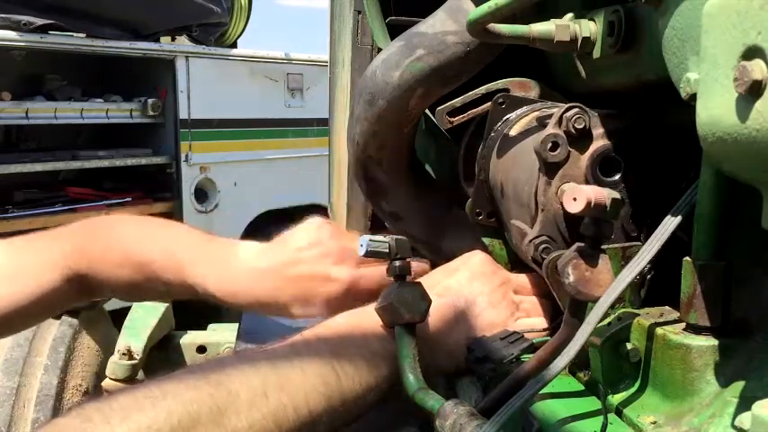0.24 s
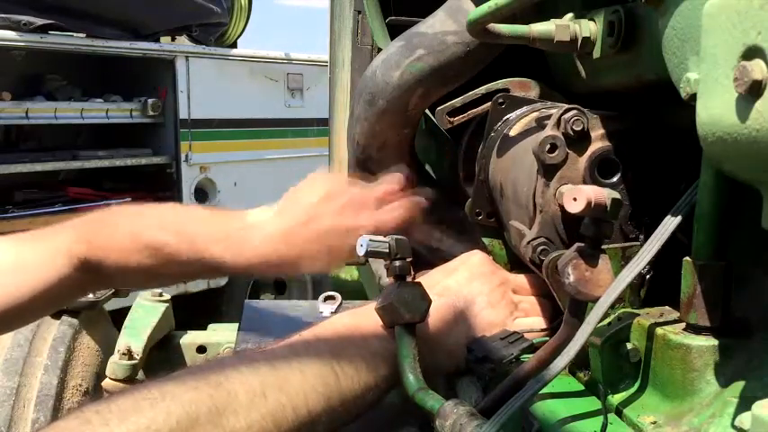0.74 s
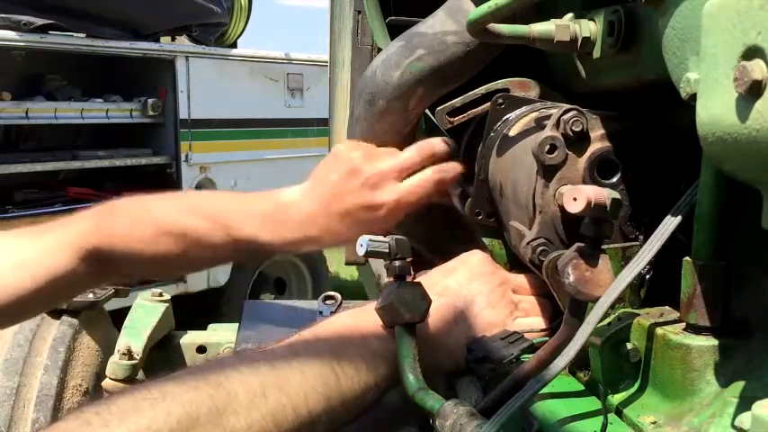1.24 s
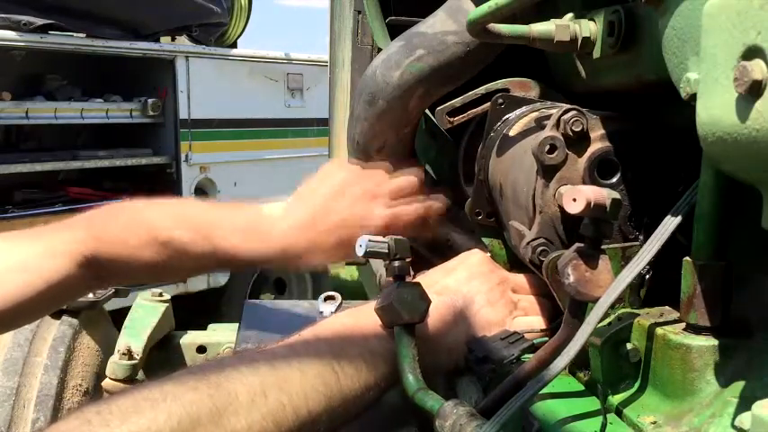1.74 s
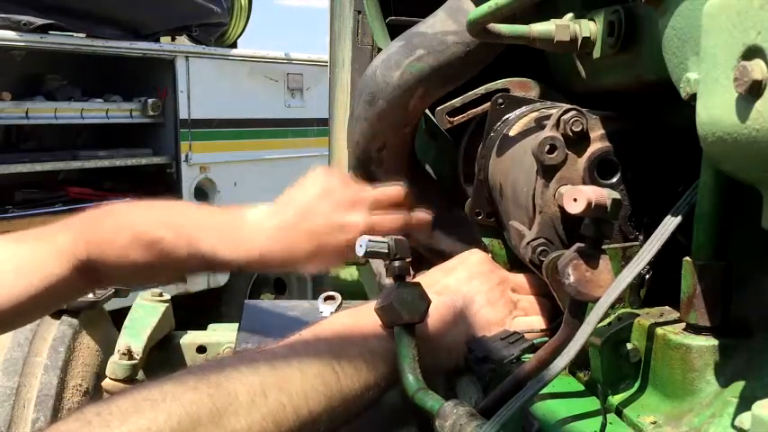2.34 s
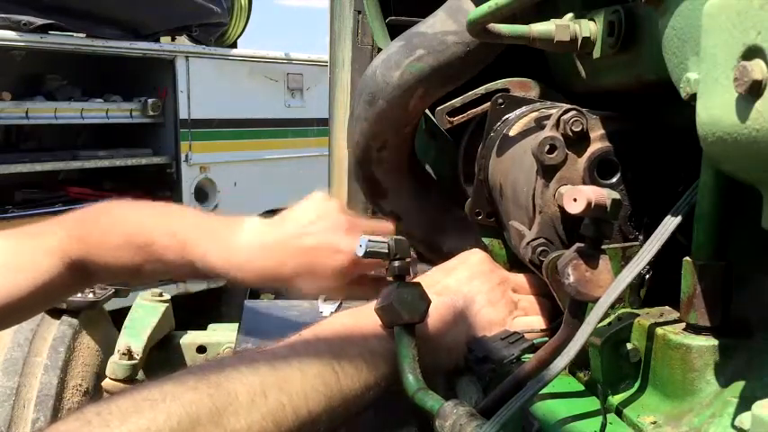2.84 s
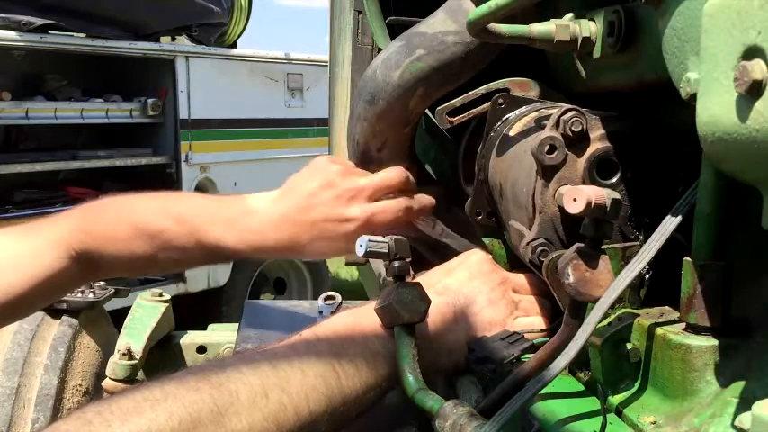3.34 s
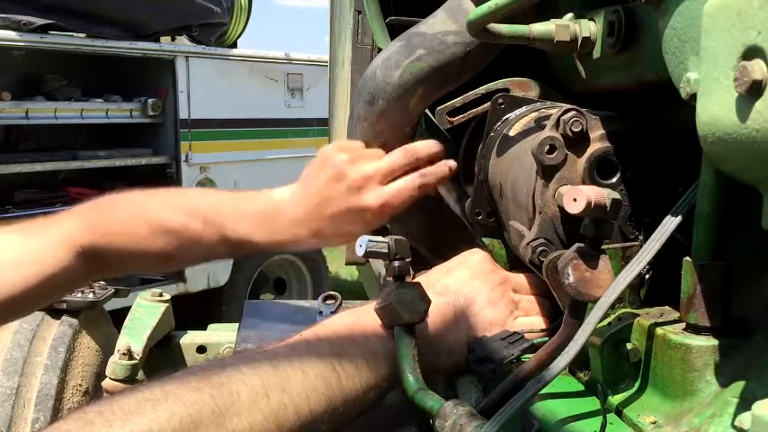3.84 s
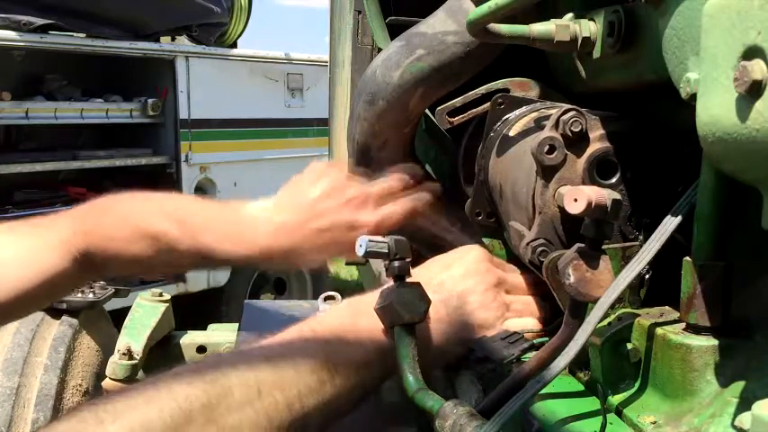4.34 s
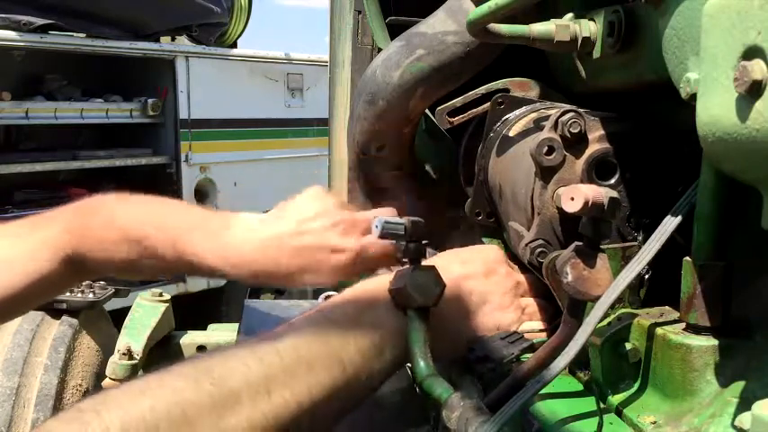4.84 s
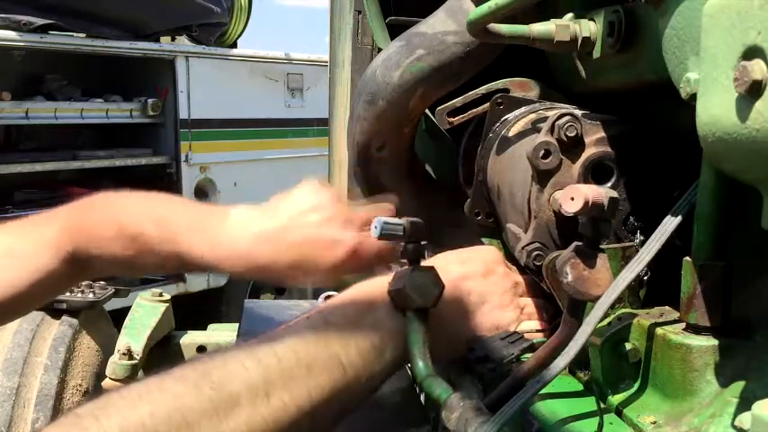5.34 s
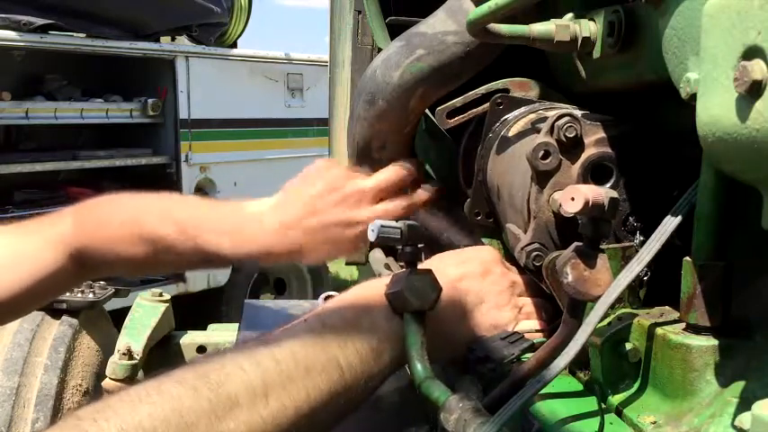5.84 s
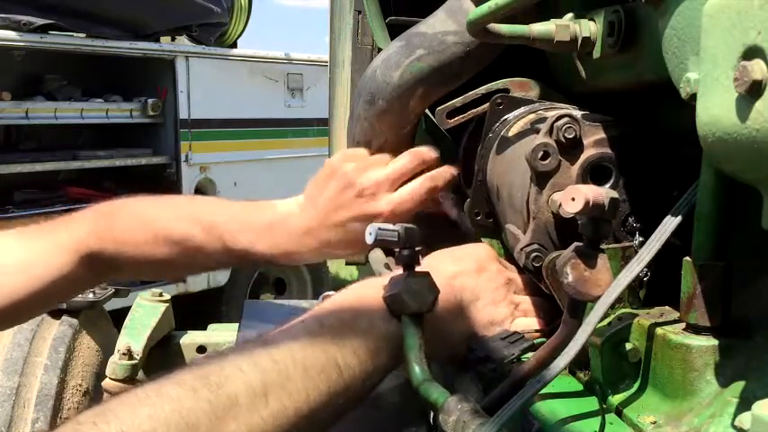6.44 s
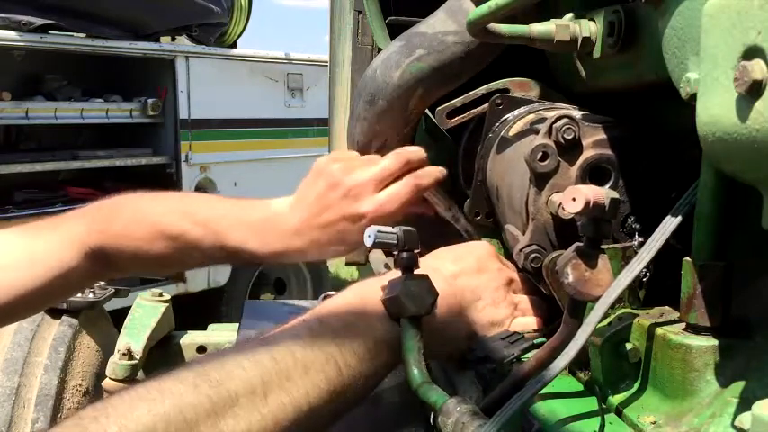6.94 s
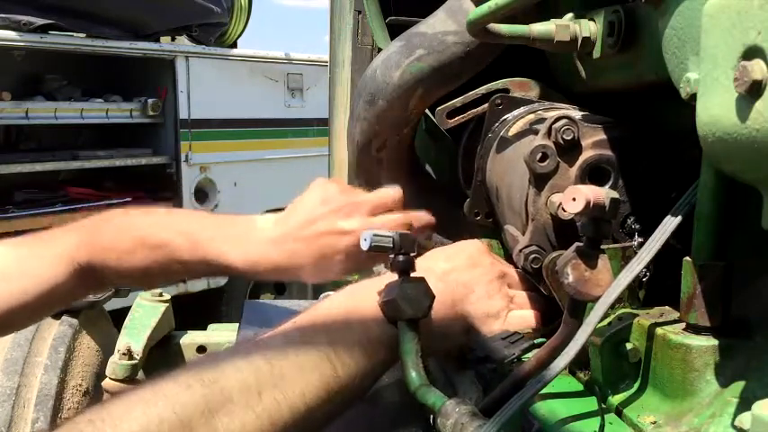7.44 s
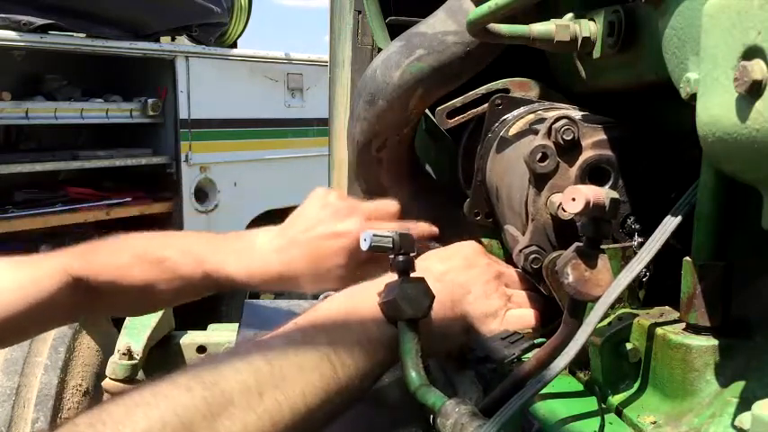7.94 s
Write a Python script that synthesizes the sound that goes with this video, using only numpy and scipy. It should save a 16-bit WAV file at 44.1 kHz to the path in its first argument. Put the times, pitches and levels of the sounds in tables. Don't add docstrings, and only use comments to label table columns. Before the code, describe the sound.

A ratchet wrench clicks in short quick bursts against machinery outdoors, with hand knocks and ringing metal clinks, while a distant truck drones past.

```python
import sys
import numpy as np
from scipy import signal
from scipy.fft import rfft, irfft
from scipy.io import wavfile
from scipy.ndimage import uniform_filter1d

SR = 44100
rng = np.random.default_rng(int(sys.argv[2]) if len(sys.argv) > 2 else 0)


def gain_from_db(level_db):
    decades = np.asarray(level_db, float) / 20
    return 10 ** decades


def put_to_file(sound):
    columns = np.atleast_2d(sound).T
    safe = np.clip(columns, -1, 1)
    whole_steps = np.round(safe * 32767)
    wavfile.write(sys.argv[1], SR, whole_steps.astype(np.int16))


N = 361179
COARSE = 21


def evened(x):
    return x / np.sqrt(np.mean(x ** 2) + 1e-20)


def read(points, hz):
    f, value = np.transpose(points)
    return np.interp(np.log(hz + 1), np.log(f + 1), value)


def curves(rows, t):
    s, *columns = np.transpose(rows)
    return [np.interp(t, s, c) for c in columns]


def add(mix, s, sound):
    part = mix[round(s * SR):][:len(sound)]
    part += sound[:len(part)]


def drift(per_s, t):
    return np.interp(t * per_s, np.arange(200), rng.standard_normal(200))


def tone(hz, db, rate=SR):
    cycles = np.cumsum(hz) / rate + rng.random()
    return np.sqrt(2) * gain_from_db(db) * np.sin(2 * np.pi * cycles)


def band(x, centre_hz, spread):
    edges = np.clip([centre_hz / spread, centre_hz * spread], 30, 20000)
    return signal.sosfilt(signal.butter(3, edges, "bandpass", fs=SR, output="sos"), x)


# (t/s, level/dB)
ROAR_LEVEL = [
    (0.0, -51),
    (0.8, -50),
    (1.76, -52.5),
    (2.9, -50.5),
    (4.2, -47.5),
    (5.86, -44.5),
    (6.27, -45),
    (7.14, -44.5),
    (8.19, -48),
]
# (f/Hz, level/dB per Hz)
ROAR_SPECTRUM = [(300, -27.5), (400, -9.5), (480, -7.5), (650, -1.5), (800, -4), (1050, 0), (1400, -9.5),
                 (2000, -15), (2600, -24), (4000, -27.5), (6000, -33.5), (9000, -39.5), (14000, -48),
                 (16000, -59.5)]
# (f/Hz, level/dB per Hz)
RUMBLE_SPECTRUM = [(25, -35), (42, -9.5), (60, 4.5), (100, 10.5), (140, 0.5), (200, 0), (320, -8.5),
                   (420, -22), (600, -54)]
HISS_DB, HISS_SHARE, RUMBLE_DB, RUMBLE_SHARE = -69, 0.98, -53, 0.98
EARLIER_DB, EARLIER_FADE_S = 9, 0.43


def smoothed(patches, bins, frames):
    return evened(uniform_filter1d(uniform_filter1d(patches, bins, 0), frames, 1))


def road():
    frames, hz = N // 256 + 5, np.fft.rfftfreq(1024, 1 / SR)[:, None]
    s = np.arange(frames) * 256 / SR
    a, b, patches, streaks, swells = rng.standard_normal((frames, 513, 5)).T
    streaks = smoothed(streaks, 2, 40)
    swells = smoothed(swells, 16, 90)
    patches = smoothed(patches, 10, 12)
    roar_db = curves(ROAR_LEVEL, s)[0]
    hiss_db = HISS_DB + HISS_SHARE * (roar_db + 50)
    rumble_db = RUMBLE_DB + RUMBLE_SHARE * (roar_db + 50)

    treble = np.clip(np.log(hz / 1500 + 1e-9) / np.log(2), 0, 1)
    upper_db = read(ROAR_SPECTRUM, hz) + (1 - treble) * (roar_db + 22) + treble * (hiss_db + 42.0)
    top = np.clip(np.log(hz / 4200 + 1e-9) / np.log(2), 0, 1.4)
    upper_db -= treble * top * 1.2 * (hiss_db + 67.5)
    leaving = np.clip(s - 6.3, 0, 1)
    upper_db += leaving * (2.0 - 6.3 * (hz < 850)) * (hz < 3800)

    earlier_db = EARLIER_DB * np.exp(-s / EARLIER_FADE_S) * (hz > 220)
    lower_db = read(RUMBLE_SPECTRUM, hz) + rumble_db + 31.5 + earlier_db
    patchy_db = (1.59 - 0.65 * treble) * patches + 1.9 * streaks + 0.34 * swells - 32.0
    z = (a + 1j * b) * np.hypot(gain_from_db(upper_db), gain_from_db(lower_db)) * gain_from_db(patchy_db)
    return signal.istft(z, nperseg=1024, noverlap=768)[1][:N]


# (f/Hz, level/dB)
IDLER_LINES = [(56, -54.5), (67, -51), (78.5, -56.5), (89.8, -38), (146, -51.5), (179, -54.5), (224, -64)]
IDLER_START_DB, IDLER_SETTLE_S, IDLER_GONE_S, IDLER_FADE_DB_S = -4.5, 0.51, 2.44, -51


def idler(t):
    level_db = IDLER_START_DB * np.exp(-2 * t / IDLER_SETTLE_S)
    level_db += IDLER_FADE_DB_S * np.clip(t - IDLER_GONE_S, 0, 2)
    out = np.zeros(len(t))
    for hz, db in IDLER_LINES:
        wavering_hz = hz * (1 + 0.0039 * drift(3.7, t))
        out += tone(wavering_hz, db + level_db + 0.97 * drift(2.6, t), SR / COARSE)
    return out


FIRING_HZ, SPEED_M_S, SOUND_M_S = 118.805, 25.137, 343


def engine_cycles(t, abreast_s, distance_m, further_m=0):
    path_m = np.hypot(SPEED_M_S * (t - abreast_s), distance_m) + further_m
    return FIRING_HZ / 8 * (t - path_m / SOUND_M_S)


# (t/s, straight level/dB, level off the wall/dB)
EXHAUST = [(0, -50, -49.5), (2.0, -48.5, -68), (2.8, -28.5, -42), (3.2, -31.5, -53), (3.6, -28.5, -41),
           (4.0, -28.5, -49), (4.4, -22.5, -34), (4.8, -26, -38), (5.2, -27.5, -29), (5.6, -25, -36),
           (6.0, -22, -32), (6.4, -23.5, -35.5), (7.2, -20, -29), (7.6, -23.5, -40.5), (7.9, -27, -29),
           (8.19, -24.5, -49)]
# (order, level/dB, lift of its beam/dB, beam sweeps us t/s, beam width/s)
ORDERS_STRONG = [(5, -42.5, 11, 5.13, 2.5), (11, -49.5, 20.5, 3.48, 1.31), (16, -46.5, 17.5, 5.183, 0.5)]
ORDERS_WEAK = [(3.19, -63.5, -1, 1.5, 1.5), (5.53, -55, 5, 3.2, 2.5), (5.96, -55.5, 9, 4.3, 1.5),
               (6.92, -54.5, 9.5, 6.2, 8.5), (8.955, -41.5, -12.5, 8.6, 0.068),
               (10.08, -55.5, 12.5, 2.3, 2), (12.1, -58.5, 9.5, 4.7, 3), (13.3, -56.5, 7, 2.53, 0.88),
               (13.2, -67, 14, 3.6, 1.2), (17.95, -68, 13, 7.8, 2.2), (19.1, -62, 15, 5.7, 1.6),
               (21.25, -74.5, 25.5, 6.15, 1.5), (23.63, -70.5, 9, 6.4, 1.8), (23.9, -69.5, 13, 5.6, 0.45),
               (24, -71.5, 21, 6.9, .5), (19, -74, 15, 2.84, 0.48), (22.5, -75.5, 18.5, 2.88, 0.39),
               (26.9, -75, 23.5, 5.3, 0.28), (20.72, -68, 20, 5.96, .4), (40.4, -78, 21.5, 5.32, 0.26)]
ABREAST_S, DISTANCE_M = 4.88, 61.071
WALL_ABREAST_S, WALL_DISTANCE_M, WALL_TO_US_M = 3.2604, 28.536, 36.93
WALL_DOUBLE_DB = -19
HIDDEN_DB, EMERGES_S, EMERGING_S = -16, 2.2, 0.15
REAR_DB = 7


def truck(t):
    cycles = engine_cycles(t, ABREAST_S, DISTANCE_M)
    bounced = engine_cycles(t, WALL_ABREAST_S, WALL_DISTANCE_M, WALL_TO_US_M)
    straight_db, wall_db = curves(EXHAUST, t)
    out = gain_from_db(straight_db) * np.sin(16 * np.pi * cycles)
    out += gain_from_db(wall_db) * np.sin(16 * np.pi * bounced)
    out += gain_from_db(wall_db + WALL_DOUBLE_DB) * np.sin(32 * np.pi * bounced)
    hidden_db = HIDDEN_DB / (1 + np.exp((t - EMERGES_S) / EMERGING_S))
    behind = np.sin(np.arctan(SPEED_M_S * (t - ABREAST_S) / DISTANCE_M))
    for orders, waver_db, rear_db in (ORDERS_STRONG, 1.1, REAR_DB * behind), (ORDERS_WEAK, 3.5, 0):
        for order, db, lift_db, s, width_s in orders:
            beam_db = lift_db * np.exp(-((t - s) / width_s) ** 2)
            level_db = db + beam_db + hidden_db + rear_db + waver_db * drift(7, t)
            out += gain_from_db(level_db) * np.sin(2 * np.pi * (order * cycles + rng.random()))
    return np.sqrt(2) * out


TREBLE_HZ, TREBLE_SHORT = 7000, 0.67
RATTLE_HZ, RATTLE_MS = 4470, 8.8


def struck(modes, bands, crack_ms, scatter_db, detune, crack_db, rattle_db=-60):
    t = np.arange(4096) / SR
    hz, db, t60 = np.transpose(modes)[:, :, None]
    luck = rng.standard_normal((2, len(modes), 1))
    build_up = 1 - np.exp(-t * hz / 2.85)
    gain = gain_from_db(db + scatter_db * luck[0] - 60 * t / t60) * build_up
    rings = (gain * np.sin(2 * np.pi * hz * (1 + detune * luck[1]) * t)).sum(0)

    noise = rng.standard_normal(len(t))
    fall = np.exp(-t * 1000 / np.clip(crack_ms, .3, 15))
    dull = signal.sosfilt(signal.butter(2, TREBLE_HZ, fs=SR, output="sos"), noise)
    crack = dull * fall * (1 - np.exp(-t / 0.00071))
    snap = fall ** (1 / TREBLE_SHORT) + 0.22 * np.sqrt(fall)
    crack += (noise - dull) * snap * (1 - np.exp(-t / 0.00037))
    rattle = evened(band(noise[::-1], RATTLE_HZ, 1.17))
    crack += gain_from_db(rattle_db) * rattle * np.exp(-t * 1000 / RATTLE_MS) * (1 - np.exp(-t / 0.004))

    spectrum, bins_hz = rfft(gain_from_db(crack_db) * crack + rings), np.fft.rfftfreq(len(t), 1 / SR)
    colour = []
    for low, high, peak_db in bands:
        in_band = irfft(spectrum * (bins_hz > low) * (bins_hz < high))
        lift_db = peak_db - 20 * np.log10(abs(in_band).max())
        colour += [(low * 1.137, lift_db), (high / 1.32, lift_db)]
    below = (colour[0][0] / 2.2, colour[0][1] - 16)
    above = (colour[-1][0] * 2.3, colour[-1][1] - 14)
    log_gain = np.log(gain_from_db(read([below] + colour + [above], bins_hz)))
    causal = np.fft.irfft(log_gain) * np.r_[1, 2 * np.ones(2047), 1, np.zeros(2047)]
    return irfft(spectrum * np.exp(rfft(causal)))


# (t/s, thud level/dB, knock level/dB, tick level/dB, length/ms)
KNOCKS = [(.23, -33, -32, -41, 10), (.247, -27.5, -29.5, -40, 12), (.375, -54, -35, -38.5, 17),
          (.405, -40.5, -34, -63, 18), (.735, -78, -42, -64, 4.5), (.949, -36, -25.5, -35.5, 6.6),
          (.960, -32, -32, -48, 17), (1.755, -33, -37, -44.5, 15), (1.764, -23, -36, -57, 10),
          (1.775, -35, -30, -40.5, 6.1), (1.794, -33, -39, -80, 16), (2.375, -57, -41, -49, 7),
          (2.396, -37, -37.5, -63, 17), (3.08, -38, -33.5, -56, 10), (3.72, -31.5, -37.5, -67, 8.2),
          (4.162, -26.5, -25.5, -34, 9.9), (5.572, -44, -38, -32.5, 6.7), (7.462, -50, -42, -63, 4),
          (7.938, -54, -40, -46, 6)]
# (f/Hz, level/dB, t60/s)
CASING = [(212, -9, 0.04), (461, -13, 0.047), (660, -10, 0.051), (972, -2.5, 0.038), (2115, -8.5, 0.04),
          (2590, -7, 0.03)]
# (t/s, level/dB, length/ms, centre f/Hz)
SCUFFS = [(.364, -58, 14, 4000), (.386, -54, 17, 9000), (.41, -59, 22, 4200), (1.758, -62, 14, 7000),
          (2.125, -63, 30, 5000), (2.34, -62, 15, 2800), (2.56, -66, 30, 7000), (2.81, -62, 25, 4000),
          (3.23, -67, 30, 6000), (4.06, -56, 24, 6500), (4.06, -62, 24, 12000), (4.06, -55, 20, 3600),
          (4.39, -59, 40, 3300), (4.39, -66, 40, 5500), (4.4, -72, 70, 11500), (4.166, -41, 8, 6800),
          (4.735, -62, 24, 5000), (.085, -58, 16, 3000), (4.39, -56, 30, 1900), (5.12, -65, 40, 7000),
          (5.578, -50, 14, 4500), (5.612, -59, 16, 7000), (6.037, -42, 22, 4800), (6.036, -49, 20, 8000),
          (6.034, -52, 20, 13000), (6.355, -63, 25, 5000), (6.51, -59, 8, 3000), (6.595, -61, 8, 6000),
          (6.73, -68, 12, 11000), (6.93, -57, 8, 4200), (6.955, -46, 10, 4800), (7.205, -61, 10, 5000),
          (7.5, -54, 12, 3400)]
# (t/s, f/Hz, level/dB)
SQUEAK = [
    (2.40, 1265, -56),
    (2.415, 1400, -50),
    (2.44, 1465, -53),
    (2.464, 1315, -45.5),
    (2.48, 1240, -55),
]
# (t/s, f/Hz, level/dB)
CHIRP = [
    (1.722, 2000, -55),
    (1.73, 2060, -51),
    (1.738, 2000, -59),
    (1.75, 2000, -50),
]
BODY_DB, BODY_THUD_SHARE = 2.5, 0.21


def hands():
    out = np.zeros(N)
    for s, thud_db, knock_db, tick_db, ms in KNOCKS:
        body_db = BODY_DB + knock_db + BODY_THUD_SHARE * (thud_db - knock_db)
        bands = [(153.5, 370, thud_db), (327, 600, body_db - 7.5), (507, 960, body_db - 3.5),
                 (807, 1250, knock_db - 3.5), (1256, 2010, knock_db - 6.0), (1780, 2760, knock_db - 6.0),
                 (3010, 5500, tick_db), (6600, 9200, tick_db - 17.5)]
        add(out, s, struck(CASING, bands, ms, scatter_db=3.0, detune=0.025, crack_db=2.0))
    for s, db, ms, centre_hz in SCUFFS:
        lengths = (np.arange(4000) - 2000) / SR * 1000 / ms
        grit = rng.standard_normal(4000) * rng.exponential(1, 4000)
        scuff = evened(band(grit, centre_hz, 1.3)) * np.exp(-(2 * lengths) ** 2)
        add(out, s - 2000 / SR, gain_from_db(db) * scuff)
    for rows in SQUEAK, CHIRP:
        start_s, end_s = rows[0][0], rows[-1][0]
        add(out, start_s, tone(*curves(rows, np.arange(start_s, end_s, 1 / SR))))
    return out


# (t/s, level/dB, head ring level/dB, treble level/dB)
PAWL_CLICKS = [(0.095, -29.5, -6.5, 5.5), (0.134, -24.5, -19, -11.5), (0.163, -24.5, -14, -18),
               (0.202, -30.5, -8, -7.5), (0.826, -25.5, -17, -11.5), (0.8556, -28, -19, -10),
               (0.889, -25, -12, -11.5), (0.9306, -34.5, 1, 1), (1.504, -22, -13.5, -13.5),
               (1.5332, -23, -18, -11), (1.559, -25, -9.5, -7), (1.5894, -25.5, -4, -11),
               (2.145, -29, -9.5, -8.5), (2.175, -28, -2, -9.5), (2.2054, -31, -8.5, -13),
               (2.8288, -25.5, -7, -9.5), (2.86, -31, -8, -3.5), (2.8939, -28.5, -14, -9.5),
               (2.9695, -34, -2.5, -5.5), (3.4507, -25, -5.5, -9.5), (3.4795, -27, -0.5, -11),
               (3.5228, -29, -5.5, -10.5), (4.071, -23, -14.5, -12.5), (4.0977, -21.5, -16, -18),
               (4.124, -31, -6, -5), (4.1614, -26, -27, -6.5),
               (4.7487, -22.5, -21, -9), (4.787, -23.5, -10.5, -13), (4.8219, -24.5, -8, -14.5),
               (4.86, -24, -9, -13.5), (5.3392, -23, -22, -12), (5.385, -24.5, -9.5, -11),
               (5.415, -24, -8, -9.5), (5.4484, -27, -10, -6.5), (5.571, -30, -14, -22.5),
               (5.607, -46, -13, -5), (5.9387, -24, -7, -11), (5.9819, -22, -14.5, -10),
               (6.0247, -25.5, -3.5, -9.5), (6.67, -26, -10.5, -4.5), (6.76, -23, -10.5, -11.5),
               (7.3502, -20.5, -13.5, -14.5), (7.6789, -26, -15.5, -10.5)]
# (head f/Hz, level/dB of four gear modes against the
PAWL_SEATS = [(2080, 3, 0, 0, -11), (2060, 11, 8, 6, 3), (1980, -7, -3, -2, -8), (2000, -5, -5, -3, -13),
              (1940, -1, -2, -1, 4), (2010, -7, 2, -4, 2), (2020, -1, 1, 20, -8), (2040, 6, -9, 1, -6),
              (2000, -4, 5, 3, 0), (2060, -6, 1, -2, -1), (2000, -9, 1, -10, -14), (2000, -8, 2, -6, -8),
              (1960, -12, -7, 3, -6), (2000, -1, 10, 23, 3), (2000, -4, 4, 0, 7), (2000, -13, 5, 6, -9),
              (1960, -9, -1, -10, -1), (2040, 9, 18, 12, 2), (2085, -5, 0, -10, 0), (2065, 3, 6, 10, -6),
              (2040, 0, 5, 3, -3), (2025, 0, 1, 5, -5), (2000, -12, -7, 8, 7), (1920, -8, -10, -8, -1),
              (2000, -3, 1, -3, -5), (2070, 6, 14, 9, 2),
              (1990, 4, -10, -3, 3), (1920, 4, 6, -3, 2), (1960, 2, -2, 2, -2), (1950, 3.5, 12, 8, 8),
              (2000, 4, 7, 8, 2), (2030, 3, 6, 5, 2), (1980, 10, 4, 7, 1), (2000, -7, 4, 3, 2),
              (2030, -4, 3, 8, 6), (2030, -9, -4, -5, 5), (1960, 3, 7.5, 7.5, 3), (2020, -1, -16, -3, -3),
              (1970, 1, 7, 7, 1), (2050, 2, -3, 2, -3), (2010, 3.5, -13, 1, 0), (2000, 0.5, -11, 0, -2.5),
              (2060, -1, -8, 4, 0)]
# (f/Hz, level/dB, t60/s)
RATCHET = [(1142, -14.5, 0.026), (2516, -12, .016), (6280, -13.5, 0.018), (6700, -15, 0.014),
           (8180, -6, 0.019), (8810, -4.5, 0.011), (9660, -5, 0.0082), (11360, -5, 0.009),
           (12130, -1, 0.0077), (13080, -6.5, 0.0079), (15160, -8.5, 0.0074)]
# (f/Hz, level/dB, t60/s)
GEAR = [(3343, -1.5, 0.015), (3756, -1.5, 0.013), (4010, -1, 0.015), (5360, -.5, 0.014), (4373, -5, 0.026)]
HEAD_DB, HEAD_T60 = 0.5, 0.024
CRACK_MS, CRACK_SPREAD = 3.5, 0.1
LOOSE_DB = 4.5


def ratchet():
    out = np.zeros(N)
    clicks = zip(PAWL_CLICKS, PAWL_SEATS)
    for (s, db, head_db, treble_db), (head_hz, *seat_db) in clicks:
        seat_db = np.r_[seat_db, 0] - max(*seat_db, 0)
        loose = np.array(RATCHET) + np.outer(rng.standard_normal(len(RATCHET)), [0, LOOSE_DB, 0])
        gear = [(hz, gear_db + lift, t60) for (hz, gear_db, t60), lift in zip(GEAR, seat_db)]
        modes = [*loose] + [(head_hz, HEAD_DB, HEAD_T60)] + gear
        bands = [(870, 1250, db + .5 * head_db - 10.5), (1250, 1610, db + .5 * head_db - 12.0),
                 (1620, 2360, db + head_db + 2.0), (3000, 5400, db + 0.31),
                 (5620, 7840, db + .5 * treble_db - 4.0), (7150, 9770, db + 0.54 * treble_db - 2.5),
                 (10100, 17000, db + treble_db + 8)]
        crack_ms = CRACK_MS * np.exp(CRACK_SPREAD * rng.standard_normal())
        click = struck(modes, bands, crack_ms, scatter_db=1.2, detune=0.0071, crack_db=-1.5, rattle_db=-18)
        add(out, s - .0002, click)
    return out


# (t/s, level/dB)
SOCKET_SLIPS = [
    (0.3727, -28),
    (.384, -35),
    (0.406, -51),
]
# (f/Hz, level/dB, t60/s)
SOCKET = [(1100, -9, 0.048), (2470, -10, 0.046), (4570, -4.5, 0.078), (5220, -11, .03), (5540, -8, 0.047),
          (5600, -5, 0.031), (6750, -8, 0.04), (7350, -3, .02), (11140, -10, .03)]
# (t/s, level/dB, f/Hz, t60/s)
TOUCHES = [(.735, -50, 2000, .03), (1.02, -55, 2000, .04), (1.1, -60, 4100, .03), (1.1, -61, 3400, .03),
           (1.22, -56, 2000, .04), (1.445, -62, 6400, .03), (1.465, -52, 2000, .06),
           (1.753, -44, 2020, .03), (1.762, -46, 2000, .02), (3.99, -65, 5750, .08), (3.86, -67, 5800, .08),
           (6.51, -52, 2000, .02), (4.519, -57, 14000, .05), (4.519, -58, 15150, .06),
           (4.519, -60, 13500, .07), (4.519, -52, 8600, .015), (7.2, -54, 4200, .02),
           (7.938, -50, 3200, .02)]


def socket():
    out, t = np.zeros(N), np.arange(4096) / SR
    for s, db in SOCKET_SLIPS:
        bands = [(920, 1800, db - 7.0), (1800, 2700, db - 13.0), (4260, 6900, db), (9000, 18000, db - 7.5)]
        add(out, s, struck(SOCKET, bands, 6.5, scatter_db=1.0, detune=0.0024, crack_db=-1.0))
    for s, db, hz, t60 in TOUCHES:
        decay = gain_from_db(db - 60 * t / t60)
        add(out, s, decay * np.sin(2 * np.pi * hz * t) * (1 - np.exp(-t / 0.0019)))
    return out


# (t/s, level/dB, low body level/dB, lower ring level/dB, upper ring level/dB)
CLINKS = [
    (.574, -22.5, -0.5, 3, -6),
    (2.056, -39.5, -9, 2, -6),
    (3.412, -42.5, -9, 1, 2),
    (4.519, -25, 4, -7, -2),
    (5.202, -25, -10, 0.5, -5),
    (5.711, -11, -6, -7, -2),
    (6.37, -16, -3.5, -1, 0),
    (6.950, -35.5, 2, -4.5, 2),
]
# (f/Hz, level/dB, t60/s)
BRACKET = [(682, -11.5, 0.038), (970, -7.5, 0.028), (1066, -11, 0.039), (1980, 4, 0.012),
           (2590, -14, 0.015), (2933, -2, 0.016), (3160, -2.5, 0.012), (780, -9.5, 0.041),
           (2365, -11, 0.014), (3540, -13.5, 0.017), (4110, -10, 0.02), (13600, -13.5, .03),
           (6510, -11, 0.042), (11500, -11, 0.087)]
BRIGHT_DB, BRIGHT_PER_DB = -21.5, 0.63
BOUNCE_S, BOUNCE_DB, FIRST_DB = .0033, -4.5, -2.5
VALLEY_DB = -6.5


def clinks():
    out = np.zeros(N)
    for s, db, low_db, lower_db, upper_db in CLINKS:
        treble_db = BRIGHT_DB + BRIGHT_PER_DB * (db + 24.5)
        bands = [(315, 570, db + low_db - 14.5), (610, 1920, db + low_db),
                 (1210, 1700, db + low_db + VALLEY_DB), (1650, 2400, db + lower_db - 3.0),
                 (2230, 2920, db - 3.0), (2850, 4070, db + upper_db - 2.0), (3830, 4800, db - 9.0),
                 (5300, 10300, db + treble_db + 4.5), (9600, 15000, db + treble_db - 11.0)]
        for late_s, blow_db in (0, FIRST_DB), (BOUNCE_S, BOUNCE_DB):
            blow = struck(BRACKET, bands, 2.84, scatter_db=4.0, detune=0.012, crack_db=0.0)
            add(out, s - .0005 + late_s, gain_from_db(blow_db) * blow)
    return out


# (t/s, level/dB, t60/s)
HANDLE_RINGS = [
    (.574, -24.5, 0.046),
    (4.519, -31.5, 0.034),
    (4.52, -27.5, 0.39),
    (5.202, -38, 0.044),
    (5.711, -11, 0.036),
    (5.713, -34, 0.34),
    (6.369, -16.5, 0.026),
]
HANDLE_HZ = 2606


def handle():
    out, t = np.zeros(N), np.arange(20000) / SR
    for s, db, t60 in HANDLE_RINGS:
        clock = t + round(s * SR) / SR
        decay = gain_from_db(db - 60 * t / np.clip(t60, .02, 1))
        add(out, s, decay * np.sin(2 * np.pi * HANDLE_HZ * clock) * (1 - np.exp(-t / 0.0014)))
    return out


# (start t/s, length/s, f/Hz, level/dB)
WHINES = [
    (6.98, .42, 3150, -62),
    (7.45, .25, 5500, -72),
    (3.75, .32, 5780, -74),
    (3.3, .15, 2000, -60),
]


def whines():
    out = np.zeros(N)
    for s, length, hz, db in WHINES:
        count = round(length * SR)
        whine = evened(band(rng.standard_normal(count), hz, 1.04))
        add(out, s, gain_from_db(db) * whine * np.hanning(count))
    return out


def machine_echo(x):
    dulled = signal.sosfilt(signal.butter(1, 5500, fs=SR, output="sos"), x)
    out, turn = np.zeros(N), np.arange(N) / SR * 2 * np.pi * 4.3
    for share in np.sin(turn), np.cos(turn):
        at = np.arange(60, 5000, 20) + rng.integers(0, 20, 247)
        taps = np.zeros(5100)
        taps[at] = rng.choice([-1., 1.], 247) * gain_from_db(-60 * at / SR / 0.098)
        out += signal.oaconvolve(dulled * share, taps / np.linalg.norm(taps))[:N]
    return out


def scene():
    t = np.arange(N // COARSE + COARSE) * COARSE / SR
    engines = signal.resample_poly(truck(t) + idler(t), COARSE, 1)[:N]
    clicks, blows, rest = ratchet(), clinks(), hands() + socket()
    echo = gain_from_db(-8.0) * machine_echo(gain_from_db(-1.5) * clicks + gain_from_db(-2) * blows + rest)
    return (clicks + blows + rest + handle() + echo + engines + road() + whines())[None]


def top_cut(x):
    return signal.sosfilt(signal.butter(12, 16930, fs=SR, output="sos"), x)


def record(dry):
    heard = signal.sosfilt(signal.butter(5, 39, "highpass", fs=SR, output="sos"), dry)
    heard = heard - 0.35 * band(heard, 10360, 1.04)
    heard = signal.sosfilt(signal.ellip(5, .3, 12, 15650, fs=SR, output="sos"), heard)
    heard = signal.sosfilt(signal.butter(12, 16200, fs=SR, output="sos"), heard)
    heard *= np.clip((N - np.arange(N)) / 40, 0, 1)
    return top_cut(heard)


dry = scene()
out = record(dry)
put_to_file(out)
```